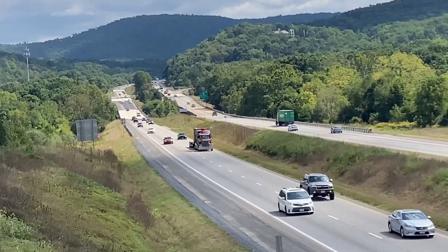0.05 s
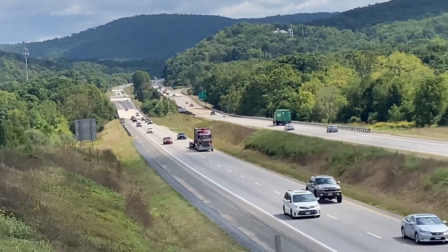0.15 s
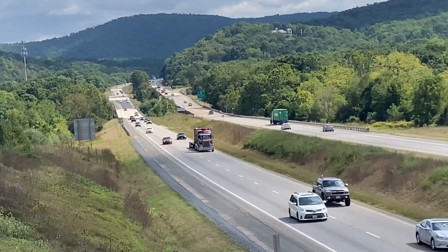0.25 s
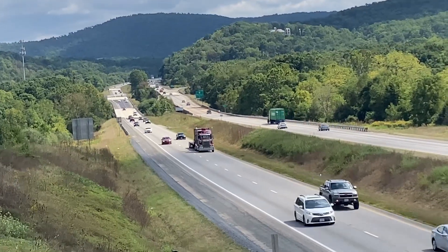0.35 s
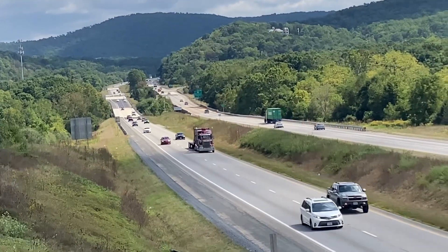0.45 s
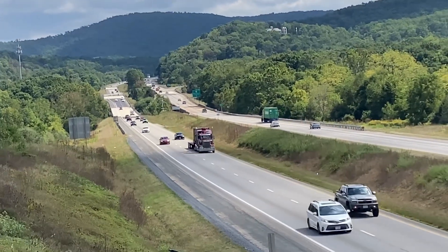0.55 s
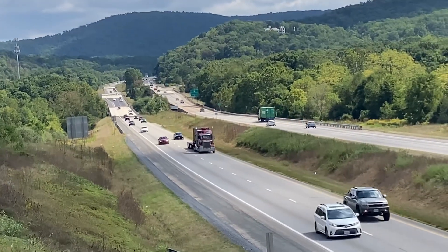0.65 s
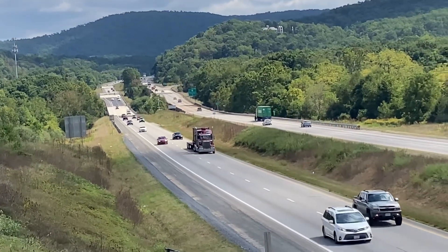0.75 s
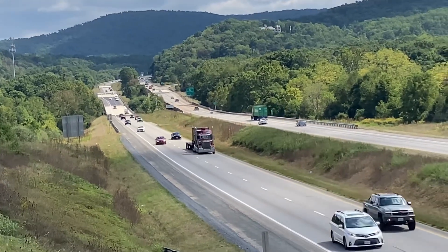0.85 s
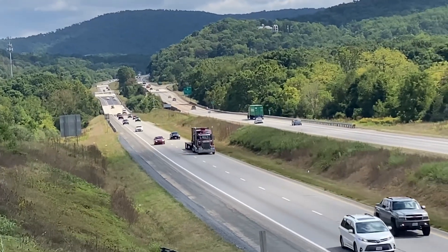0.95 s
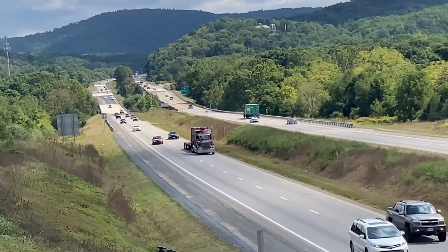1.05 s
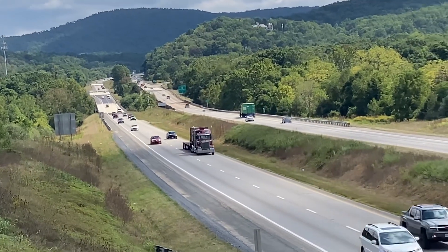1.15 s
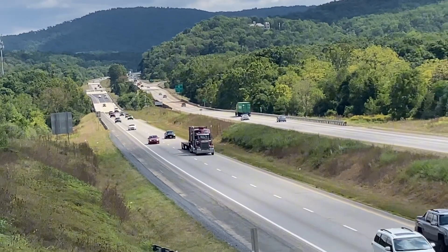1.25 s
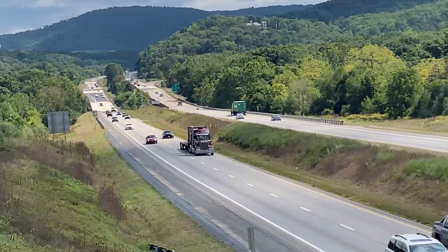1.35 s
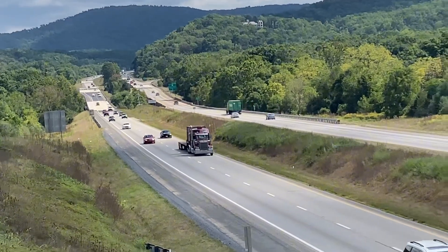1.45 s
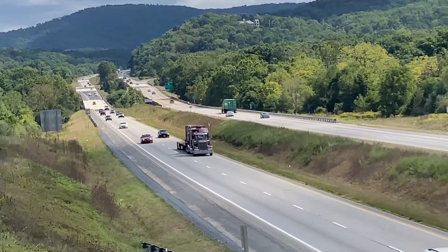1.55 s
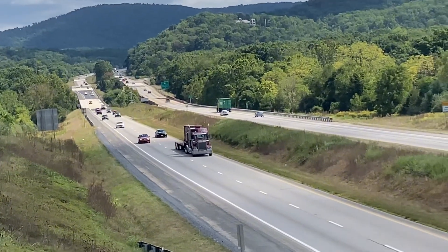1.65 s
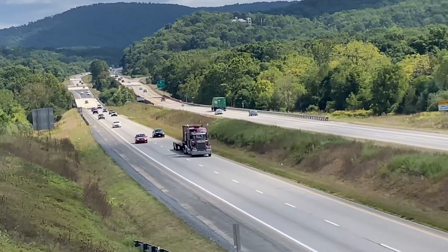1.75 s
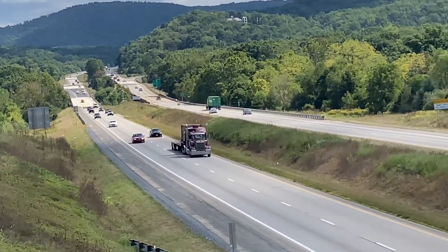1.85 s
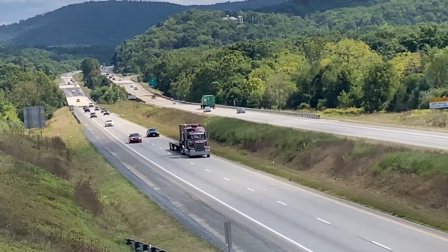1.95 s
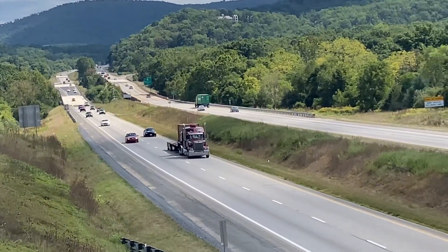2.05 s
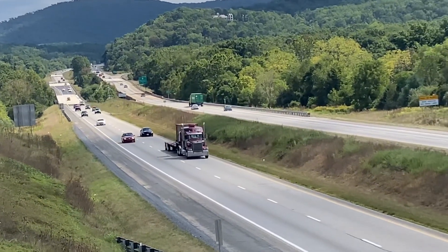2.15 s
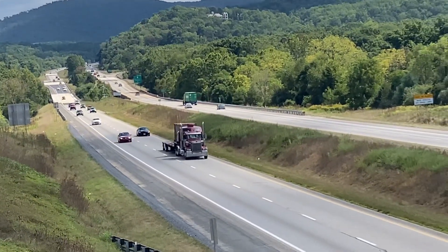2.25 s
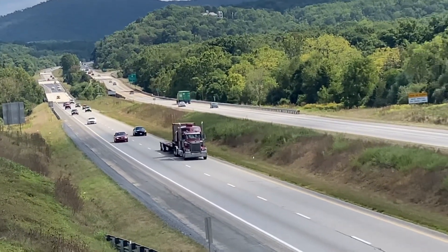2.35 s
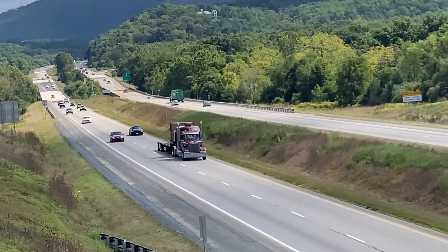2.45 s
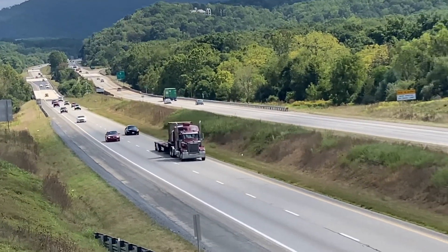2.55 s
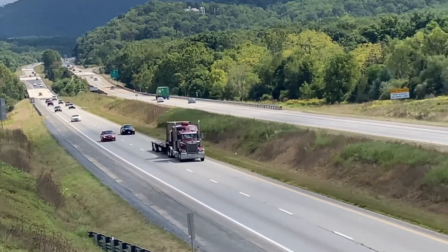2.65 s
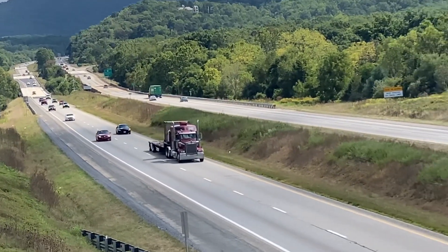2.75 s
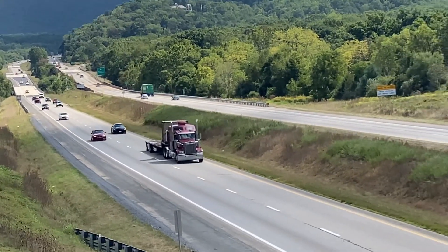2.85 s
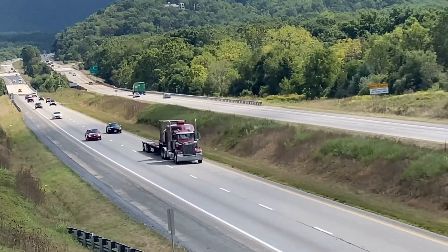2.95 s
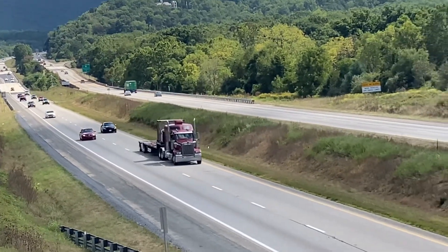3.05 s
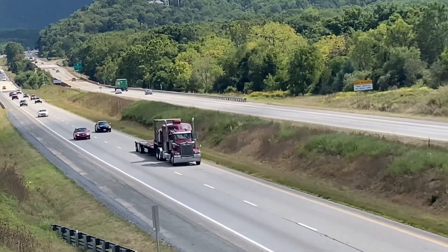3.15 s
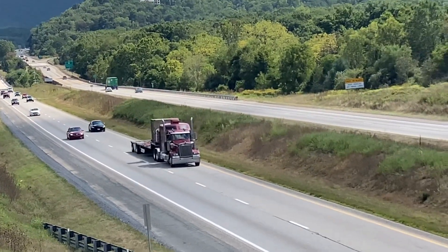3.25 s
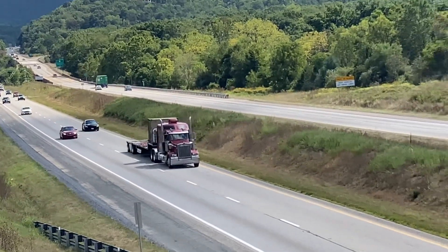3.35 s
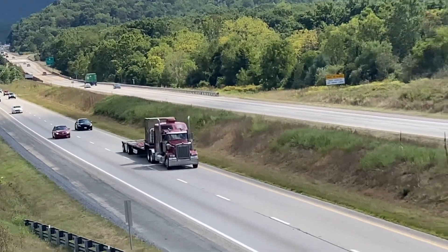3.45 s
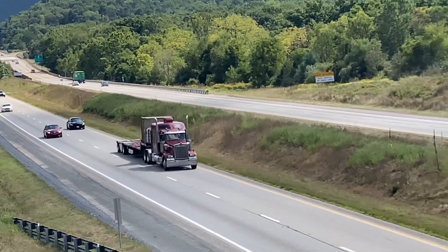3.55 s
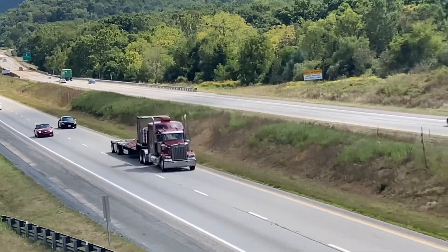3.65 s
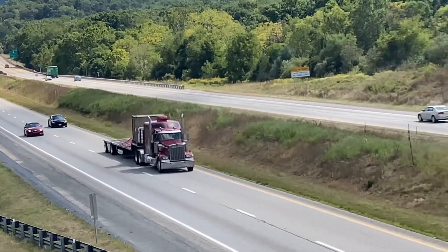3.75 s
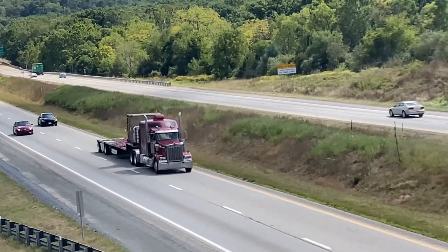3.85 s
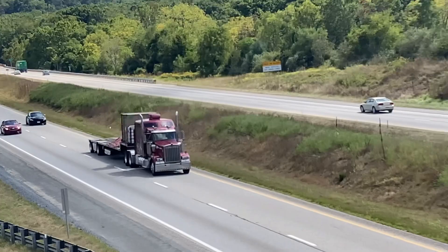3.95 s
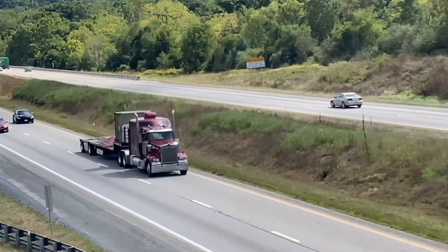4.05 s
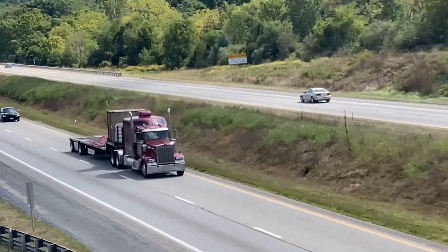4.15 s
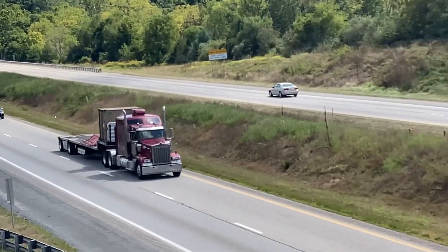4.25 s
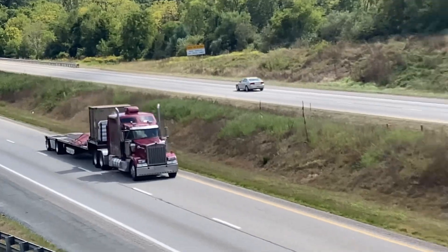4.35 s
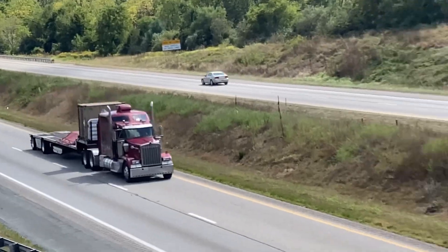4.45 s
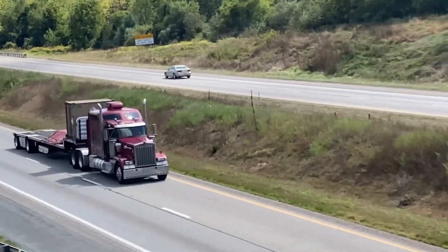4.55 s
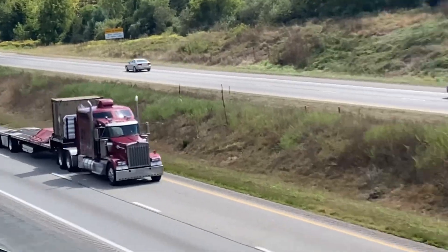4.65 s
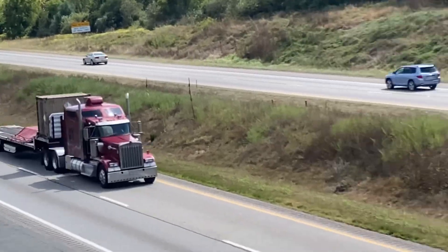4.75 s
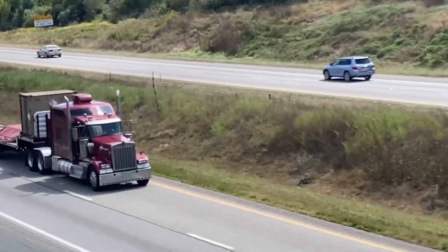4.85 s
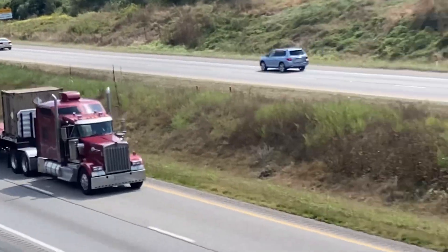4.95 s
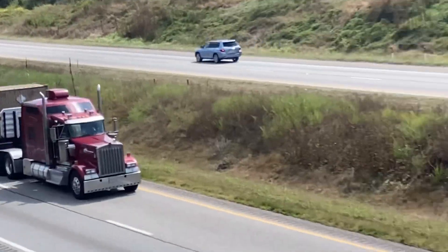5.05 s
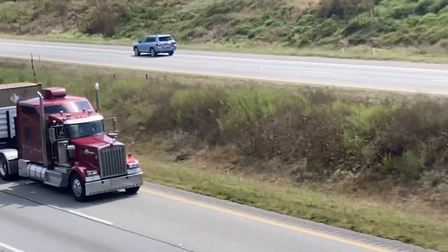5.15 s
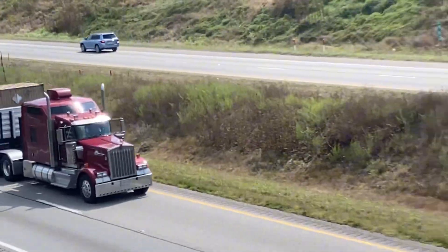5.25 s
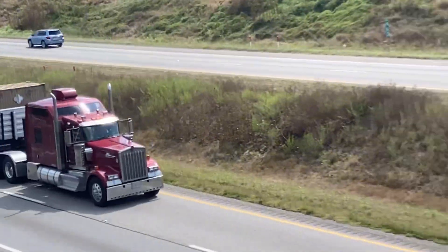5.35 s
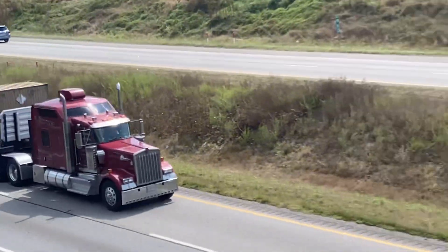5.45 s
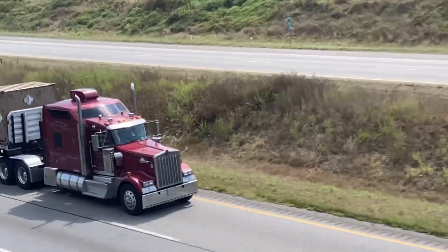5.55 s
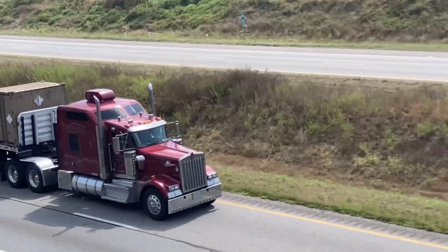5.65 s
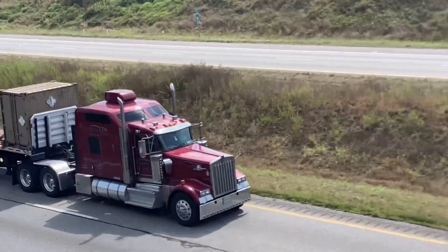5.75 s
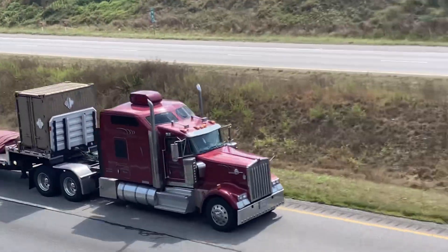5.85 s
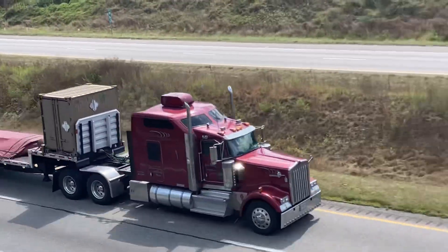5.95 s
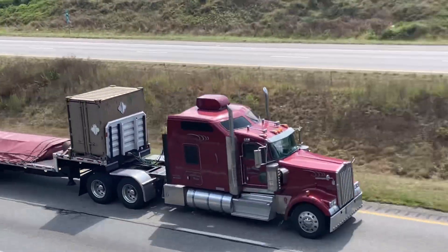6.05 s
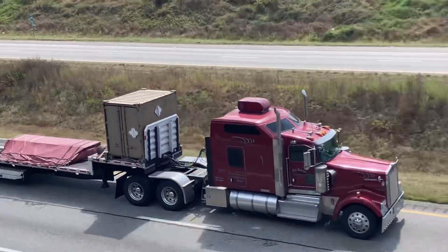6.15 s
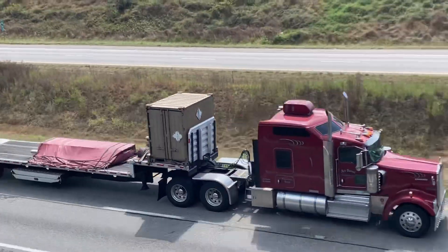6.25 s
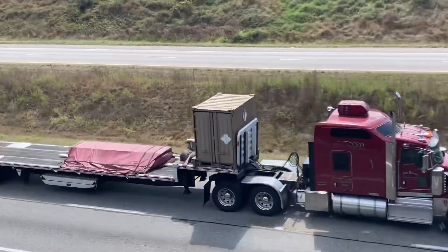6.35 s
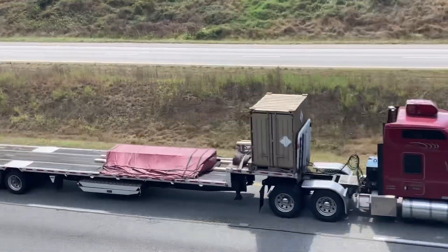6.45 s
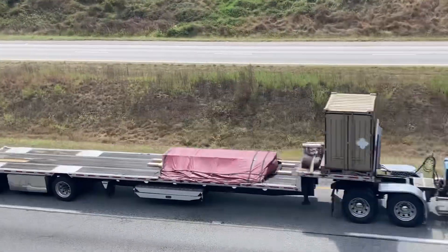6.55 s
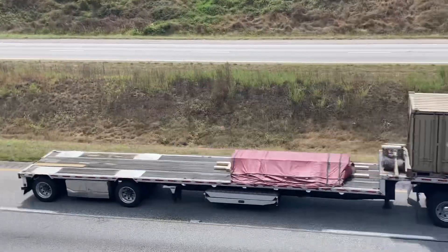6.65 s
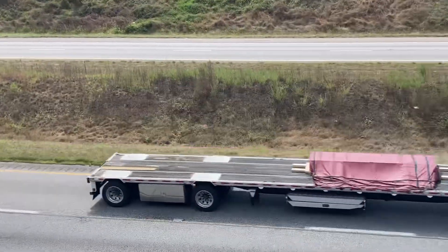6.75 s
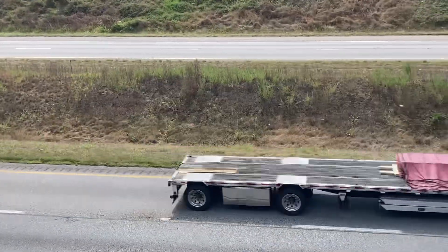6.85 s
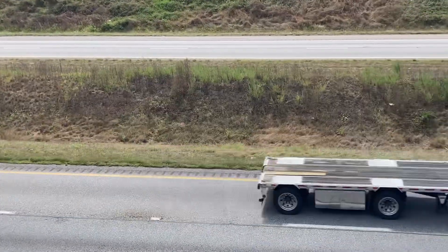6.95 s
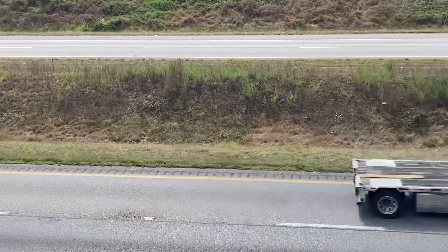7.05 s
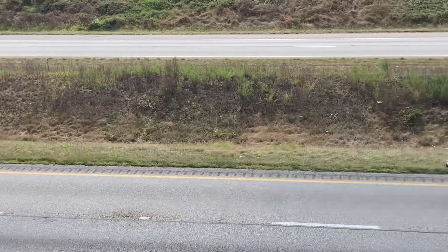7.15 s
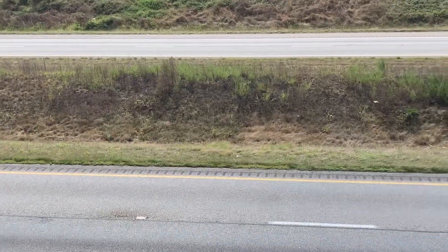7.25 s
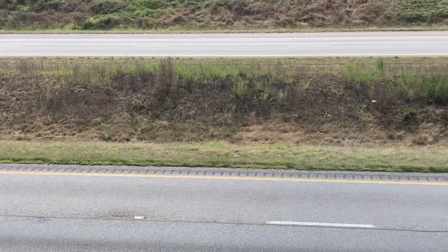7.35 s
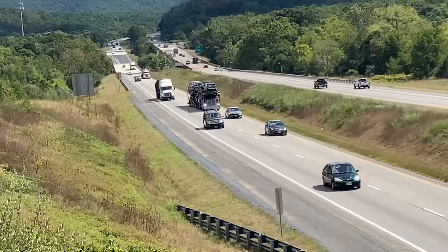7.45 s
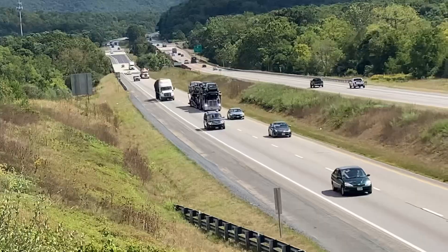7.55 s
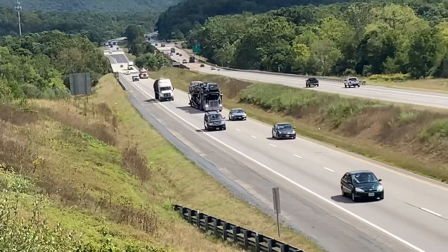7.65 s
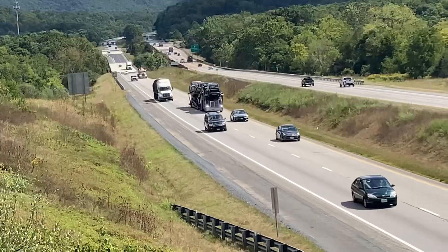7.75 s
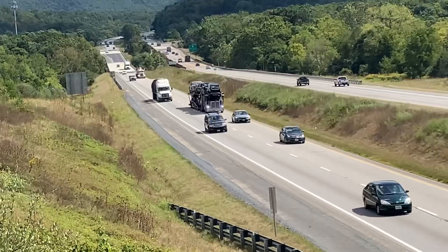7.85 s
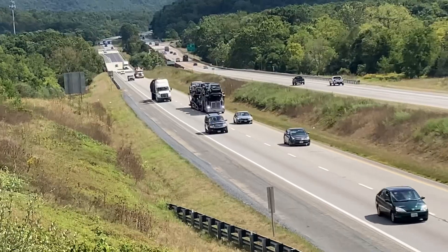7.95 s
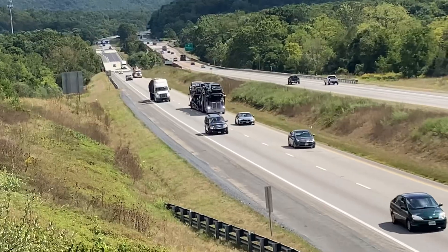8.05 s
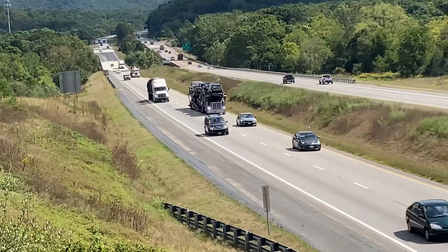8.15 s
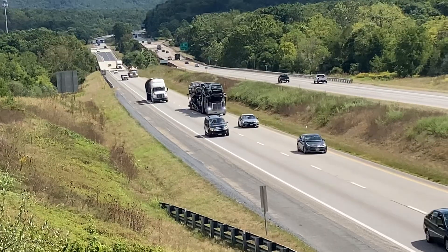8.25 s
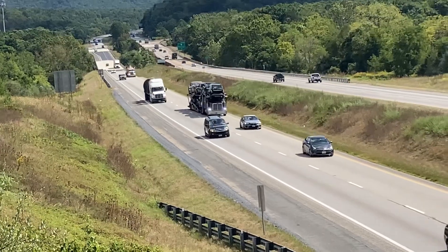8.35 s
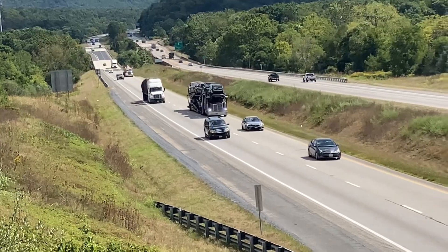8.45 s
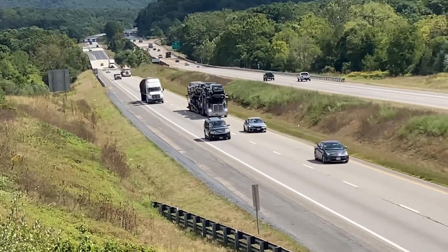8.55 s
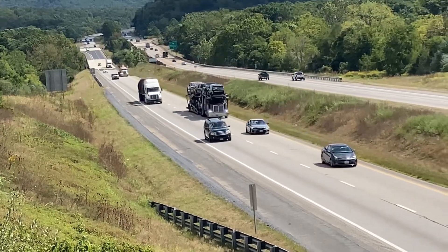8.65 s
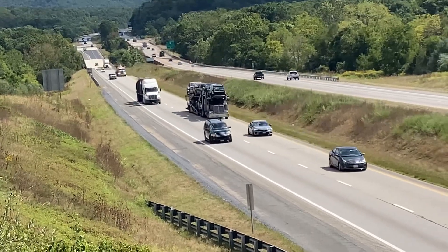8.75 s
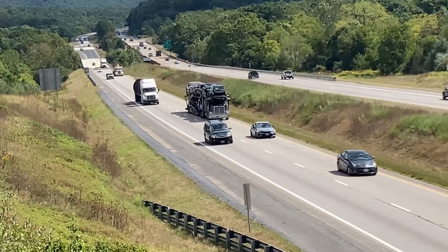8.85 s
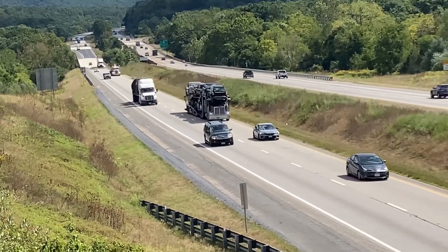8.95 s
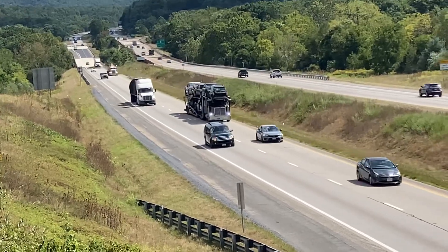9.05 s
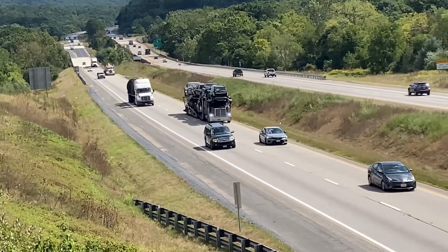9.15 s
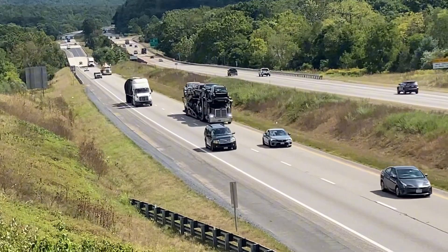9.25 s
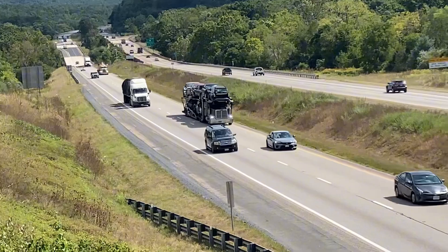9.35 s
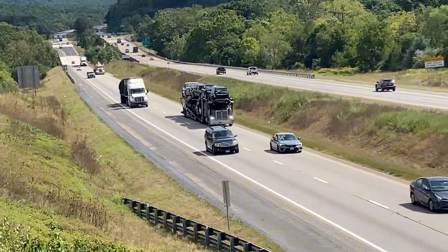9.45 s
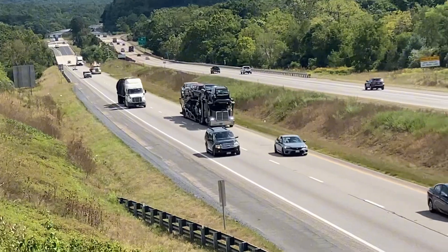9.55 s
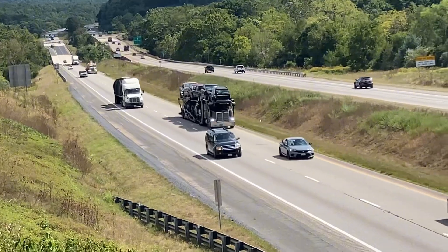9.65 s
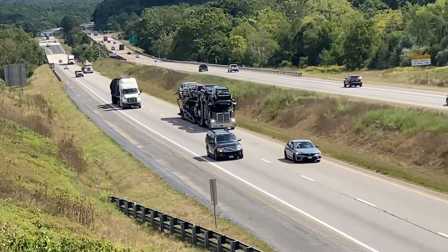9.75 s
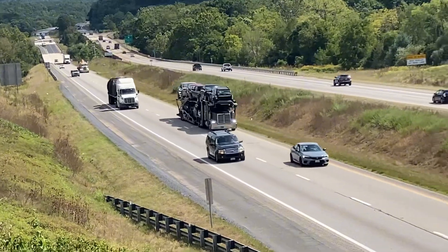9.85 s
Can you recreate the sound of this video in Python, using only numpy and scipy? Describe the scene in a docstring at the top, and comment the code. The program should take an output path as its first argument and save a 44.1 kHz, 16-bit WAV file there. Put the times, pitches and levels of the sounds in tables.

```python
"""Tyre roar and engine hum of a first car, then a droning pickup, on a busy highway below a grassy bank.
A heavy truck nears and passes with whining treads; then the scene jumps to a quieter moment with more cars.
Roar, rumble, wash and wind are random spectra; engine, exhaust, treads and tyre ring are wavering sines.
Two microphones a hand apart hear the sources with left-right lags."""
import sys
import numpy as np
from scipy import signal
from scipy.io import wavfile
from scipy.ndimage import uniform_filter1d

SR = 44100
rng = np.random.default_rng(int(sys.argv[2]) if len(sys.argv) > 2 else 0)


def persist_wave(psi):
    """Save psi, clipped to +-1, as 16-bit WAV."""
    counts = np.round(np.clip(psi, -1, 1) * 32767).astype(np.int16)
    wavfile.write(sys.argv[1], SR, np.atleast_2d(counts).T)


N = 436590

# One table per moment, traffic level: t/s, tyre roar/dB, body drone/dB,
# hiss near 3.7 kHz/dB re roar, air near 11 kHz/dB re roar
TRAFFIC = [
    [(0, -27.5, -29.5, -33, -42), (.5, -22.5, -32, -18.5, -38), (1.02, -24.5, -36.5, -21, -31.5),
     (1.4, -27.5, -37, -21.5, -33), (1.75, -27, -35.5, -17, -49), (2.1, -22.5, -35, -24, -38),
     (2.45, -22, -29.5, -17, -32.5), (3.0, -25, -33.5, -21, -25), (3.35, -29.5, -40, -13, -32.5),
     (3.8, -32.5, -42.5, -17.5, -49), (4.4, -32.5, -38.5, -16, -37), (4.9, -31, -35, -14, -27),
     (5.5, -27, -29, -15, -22.5), (5.95, -23.5, -25, -14, -21), (6.28, -21.5, -23.5, -16, -19),
     (6.65, -25, -23.5, -14, -22), (6.9, -25, -25.5, -20, -32.5), (7.45, -25.5, -36, -23.5, -40)],
    [(7.45, -36, -37.5, -18, -38), (7.73, -27, -39, -19.5, -47), (8.3, -24.5, -41, -23.5, -45),
     (8.8, -25, -33.5, -23.5, -43), (9.2, -22.5, -36, -22, -37), (9.55, -22, -33.5, -21.5, -35),
     (9.9, -27, -39, -26, -26)],
]
# One table per moment, bearing: t/s, left lag of nearest vehicle/samples, far-traffic share,
# wash from all around/dB re roar, L-R level/dB
BEARING = [
    [(0, 6.5, 0.44, 5.5, 0.5), (.5, 5.5, 0.039, -3.5, .5), (.9, 7, .03, -1, 0), (1.5, 7.5, 0.1, 2, 0),
     (2.05, 4, .05, -4, 0.5), (2.35, 7, 0.33, -3.5, 0.3), (2.7, 5, 0.026, -3.5, 0),
     (3.3, 14, 0.031, -0.5, -0.3), (4.1, 5, 0.17, -1, -0.2), (4.5, 9, .2, 1, 0), (4.65, -0.5, 0.3, -1, 0.5),
     (6, -5, 0.046, -3, 1), (6.5, -1, 0.1, -2.5, 1), (6.95, 5, 0.46, -2.5, 0.5), (7.45, 13, 0.7, -7, 0.5)],
    [(7.45, 1.6, 0.065, -8.5, 0.5), (9.2, 1.5, 0.018, -6, 0.5), (9.9, 6.8, 0.058, -0.5, 0.64)],
]
# Tyre roar, spectrum: f/Hz, relative density/dB
TYRE_SPECTRUM = [(300, -11.5), (600, -24), (800, -9.5), (1050, -7), (1400, -11), (1700, -14), (2100, -15.5),
                 (2300, -18), (3050, -16), (3400, -15.5), (4200, -14.5), (5800, -26), (7500, -24.5),
                 (11000, -38), (16000, -45.5)]
# Engine rumble, spectrum: f/Hz, relative density/dB
RUMBLE_SPECTRUM = [(40, -34), (70, 4.5), (100, -6.5), (150, -6.5), (220, -7.5), (350, -35)]
# Body drone, spectrum: f/Hz, relative density/dB
DRONE_SPECTRUM = [(120, -4), (220, -3), (350, -1.5), (480, -7), (700, -4), (1100, -9.5)]
# Deep rumble, spectrum: f/Hz, relative density/dB
DEEP_SPECTRUM = [(20, -18), (42, -4.5), (60, 9), (100, -4.5)]
# Wash from all around, spectrum: f/Hz, relative density/dB
WASH_SPECTRUM = [(150, -22), (300, -7), (550, 0), (850, 0), (1400, -5), (2200, -9), (3500, -19),
                 (6000, -30), (16000, -45)]
# Wind on each microphone, spectrum: f/Hz, relative density/dB
WIND_SPECTRUM = [(20, -12), (45, -4), (90, -22), (200, -2), (400, -42)]
# Bass: t/s, deep rumble level/dB, engine rumble level/dB
BASS_LEVEL = [(0, -29.5, -29.5), (1, -36, -28.5), (1.7, -38, -34), (2.5, -36, -26.5), (3.4, -35, -31),
              (4.7, -54, -31), (6.1, -50, -25.5), (6.7, -35.5, -37), (7.45, -41, -32.5), (7.46, -43, -36.5),
              (9.9, -43, -30.5)]
# Road echo: t/s, loudest roar f/Hz, strength 0-1
ROAD_ECHO = [(0, 1020, 0), (7.45, 970, 0.02), (7.46, 1090, 0.46), (8.8, 1070, 0.72), (9.55, 1230, 0.7),
             (9.9, 1010, 0)]
# Bands of the roar that stand out or sink: peak t/s, f/Hz, glide/(Hz/s), width/octaves,
# lift/dB, duration/s, L-R level/dB
ROAR_BANDS = [(1.13, 3370, 1, 0.15, 6, 0.42, 4), (2.96, 3300, 0, 0.27, 7, .5, 3),
              (6.2, 2320, -150, 0.07, 10.5, 0.74, 1), (5.74, 820, 0, 0.17, 5.5, 0.43, 1),
              (7.29, 926, -51, 0.22, 6, 0.32, 6), (7.27, 2260, 0, 0.35, 5, 0.42, -3),
              (8.3, 4500, 50, 0.13, 6.5, 0.89, -3), (9.05, 1000, 50, 0.27, 4, 1, -5),
              (8.3, 1680, 50, 0.096, 8, 1.0, 2), (9.38, 3850, 1900, 0.11, 6.5, 0.5, 2),
              (7.2, 2800, 0, .2, 6, .4, 0), (5.95, 600, -45, .11, 8, .85, 3),
              (5.1, 500, -30, .17, -6, .8, 0), (5.25, 880, 0, .5, 2, 0.29, 0),
              (5.06, 404, -20, .15, 4, .45, -2), (6.33, 354, -60, 0.18, 5, 0.59, -2),
              (8.4, 350, -60, 0.11, 6, .3, 0), (1.2, 1920, 0, 0.16, 4, 0.93, 4),
              (8.4, 2290, 0, 0.11, 5.5, 1, 4), (0.39, 590, 700, 0.38, 6.5, 0.27, -3),
              (0.5, 920, 350, .2, 4.5, 0.25, -4), (1.07, 1580, 1400, 0.27, 6, 0.16, 2),
              (2.4, 1010, 1200, 0.18, 4, 0.28, 3.5), (2.5, 2000, 500, 0.21, 1.5, 0.53, 2),
              (3.3, 700, 0, 0.44, 0, .25, -4), (9.5, 1600, 200, 0.11, 2.5, .25, 2),
              (9.36, 2250, 0, 0.21, 9.5, 0.33, 2), (8.57, 2950, 0, 0.084, 12, 0.55, 2),
              (4.2, 7300, 0, 0.18, 6.5, 0.64, 0), (8.4, 5400, 0, 0.11, 6, 0.72, 0),
              (5.6, 3730, -150, .07, 5, .8, 0), (5.2, 5500, 0, .15, -7, 0.82, -2)]
# Hiss of each car in turn sweeping across: t/s, left lag/samples
HISS_LAG = [(0, 2), (.3, 4), (.75, 10), (1.45, 15), (1.55, 8), (2.05, 12), (2.15, 3), (2.7, 10), (3.2, 15),
            (3.5, 15.5), (3.58, 10), (4.35, 6), (4.45, -3), (5.9, -3.5), (6.4, 0), (7.44, 8), (7.46, 1),
            (8.5, 2), (9, 5), (9.4, 10.5), (9.9, 14)]
# Stereo spread: f/Hz, diffuse share of a near vehicle, left-right likeness of diffuse sound
STEREO_SPREAD = [(60, .1, .9), (300, .05, .6), (620, .03, -.45), (1200, .03, 0), (2500, .12, 0),
                 (5000, .3, 0), (7000, .1, 0)]
# Weight of the L-R level against frequency: f/Hz, factor
SHADE_WEIGHT = [(100, .1), (700, 2.9), (1500, 5), (2800, 3.3), (5000, .1), (9000, .05)]
# Truck tread whines: peak t/s, f at rest/Hz, axle behind middle/m, blur/cycles, level/dB, swell/s, fade/s
TRUCK_TREADS = [(6.6, 312, 6, 0.07, -25, .13, 0.1), (6.63, 342, 7, 0.1, -23, 0.15, 0.1),
                (6.88, 332, 4, .05, -27, .12, .12), (5.55, 319, 6, .07, -35, .3, .3),
                (5.97, 372, 5, .04, -25.5, .22, .25), (6.33, 372, 5, 0.07, -19.5, .11, 0.17),
                (6.68, 370, 5, .05, -22.5, .25, .13), (6.0, 546, 5, 0.09, -25, .5, 0.3),
                (6.33, 546, 4, .09, -24, .2, .15), (6.53, 548, 5, 0.1, -23.5, .12, 0.15),
                (6.88, 546, 4, .09, -33, .15, .15), (7.13, 538, 3, .07, -32, .17, .07),
                (4.8, 586, 5, .08, -37, .2, .25), (5.15, 556, 5, .08, -35, .2, .2),
                (5.58, 588, 5, .08, -30.5, .2, .2), (5.8, 566, 5, .12, -29, .4, .15),
                (6.1, 585, 5, .09, -30, .25, .2), (6.62, 582, 5, .09, -28, .2, .1),
                (6.25, 1020, 0, .1, -35, .5, .3), (6.76, 1020, 0, .07, -28, .17, .08),
                (6.25, 815, 0, .1, -31, .1, .1), (5.35, 350, 6.5, 0.1, -34, .4, 0.3)]
# Air ring in the truck tyres: t/s, level/dB
CAVITY_LEVEL = [(4.1, -39), (4.3, -35.5), (4.7, -31.5), (5.1, -34.5), (5.45, -26), (5.85, -26.5),
                (6.02, -29), (6.2, -26.5), (6.55, -22.5), (6.8, -30.5), (7.0, -43)]
# Pickup exhaust drone: t/s, level/dB
EXHAUST_LEVEL = [(.8, -41), (1.4, -34), (1.5, -26), (2.2, -22), (3.03, -20.5), (3.3, -26.5), (3.42, -34),
                 (3.6, -24.5), (3.74, -25.5), (3.96, -35), (4.06, -26.5), (4.35, -34.5), (4.65, -42),
                 (4.85, -33.5), (5.15, -32), (5.4, -49)]
# Pickup tread whine: peak t/s, f at rest/Hz, axle behind front/m, blur/cycles, level/dB, swell/s, fade/s
PICKUP_TREAD = (2.9, 306.5, -1, 0.08, -36, 1.5, 0.5)
# First car's engine: peak t/s, firing order, level/dB, swell/s, fade/s
ENGINE_ORDERS = [(0.15, 1, -29.5, 0.28, 0.44), (1.03, 1, -29, .25, 0.2), (.72, 2, -28, .25, 0.33),
                 (.5, 3, -30.5, .15, 0.2), (0.479, 4, -32.5, 0.298, 0.2)]
# Faint hum off to one side: peak t/s, f/Hz, level/dB, swell/s, fade/s
FAR_HUM = (10.5, 492.5, -44, 1.5, 1)
# Passing truck: abreast t/s, speed/(m/s), distance to lane/m
TRUCK_PASS = (6.6, 31, 19)
# Passing pickup: abreast t/s, speed/(m/s), distance to lane/m
PICKUP_PASS = (3.18, 30, 17)

# left lag/samples: far traffic; one constant lag for all treble above about 6 kHz
FAR_LAG_SAMPLES, TREBLE_LAG_SAMPLES = -16.5, 8
WASH_COMB_EXPONENT = 0.33  # the wash keeps this share, in dB, of the road echo's notch
WIND_DB = -45
WHEEL_HZ, TREAD_THROB = 9.7, 0.3  # tyres are not quite round: whines pulse once a turn
CAVITY_HZ, CAVITY_CYCLES_PER_TURN, CAVITY_AXLE_M = 203.6, 21.2, -1.5  # at rest; axle behind truck middle
EXHAUST_HZ = 138.9  # at rest
FIRING_HZ, SAG_HZ_PER_S = 84, 1.4  # at t = 0
EDGE_HZ = 15800


def gain_of(db):
    """Decibels to amplitude."""
    return 10 ** (np.asarray(db) / 20)


def evened(x):
    """Scales to rms 1."""
    return x / np.sqrt(np.mean(x ** 2) + 1e-20)


def columns(rows, x):
    """Interpolates every column after the first at x."""
    knots, *values = np.transpose(rows)
    return [np.interp(x, knots, v) for v in values]


def wander(t, top_hz):
    """Slow random curve of rms 1: 16 sines up to top_hz, weaker with frequency."""
    rates_hz = np.geomspace(top_hz / 8, top_hz, 16)
    return evened(sum(np.sin(2 * np.pi * (f * t + rng.random())) / np.sqrt(f) for f in rates_hz))


def shape(points, hz, lo_hz, hi_hz):
    """Power spectrum as a column, summing to 1 between lo_hz and hi_hz."""
    f, db = np.transpose(points)
    power = gain_of(2 * np.interp(np.log(hz + 1), np.log(f), db, left=-60, right=-60))
    return (power / power[(hz > lo_hz) & (hz < hi_hz)].sum())[:, None]


def swell(peak_s, db, rise_s, fade_s):
    """Times and level of a sound 10 dB down rise_s before and fade_s after its peak."""
    t = np.arange(max(peak_s - 1.6 * rise_s, 0), peak_s + 1.47 * fade_s, 1 / SR)
    return t, db - 10 * ((t - peak_s) / np.where(t < peak_s, rise_s, fade_s)) ** 2


def doppler(t, abreast_s, speed, lane_m, axle_m=0):
    """Pitch factor of a point on a passing vehicle, from its closing speed."""
    to_go_m = speed * (abreast_s - t) + axle_m
    away_m = np.hypot(to_go_m, lane_m)
    return 1 / (1 - speed / 343 * to_go_m / away_m)


def tone(t, hz, db, lag, waver_db, fuzz, throb=0):
    """Start time and stereo sine, wavering in level and phase; left ear lags by lag samples."""
    phase = 2 * np.pi * (np.cumsum(hz) / SR + fuzz * wander(t, 30))
    level = np.sqrt(2) * gain_of(db + waver_db * wander(t, 24))
    level = level * (1 + throb) * signal.windows.tukey(len(t), .1)
    return t[0], level * np.sin([phase - 2 * np.pi * hz * lag / SR, phase])


def add(mix, s, sound):
    """Mixes a stereo sound in at s seconds."""
    part = mix[:, round(s * SR):][:, :sound.shape[1]]
    part += sound[:, :part.shape[1]]


def tyre_power(t, hz, roar_db, hiss_db, air_db):
    """Tyre roar: fixed tread spectrum plus moving hiss and air, with flickering treble."""
    f = hz[:, None]
    tread_power = shape(TYRE_SPECTRUM, hz, 750, 1700)
    # lifts relative to what the tread spectrum already holds in each band
    hiss_db = hiss_db - 10 * np.log10(tread_power[(hz > 3000) & (hz < 4500)].sum())
    air_db = air_db - 10 * np.log10(tread_power[(hz > 9800) & (hz < 12500)].sum())
    knots = np.log([1500, 3700, 11000])
    hissy = np.interp(np.log(f + 1), knots, [0, 1, 0])
    airy = np.interp(np.log(f + 1), knots, [0, 0, 1])
    # flicker grows with each octave
    treble_octaves = np.log2(np.maximum(f, 1500) / 1500)
    top_octaves = np.log2(np.maximum(f, 6000) / 6000)
    colour_db = hissy * hiss_db + airy * air_db
    colour_db += top_octaves * wander(t, 40) + 0.53 * treble_octaves * wander(t, 50)
    colour_db += 0.7 * np.exp(-np.log2((f + 1) / 1900) ** 2) * wander(t, 70)  # grit of the asphalt
    return tread_power * gain_of(2 * (roar_db + colour_db))


def roar_bands(t, f):
    """Gliding bands that stand out or sink: lift and L-R level, both in dB."""
    bands_db, lean_db = 0, 0
    for peak_s, band_hz, glide, octaves, lift_db, lasts_s, side_db in ROAR_BANDS:
        centre_hz = np.maximum(band_hz + glide * (t - peak_s), 200)
        off_octaves = np.log2((f + 1) / centre_hz)
        band = np.exp(-(off_octaves / octaves) ** 2 - ((t - peak_s) / lasts_s) ** 2)
        bands_db = bands_db + lift_db * band
        lean_db = lean_db + side_db * band
    return bands_db, lean_db


def road_comb(t, f):
    """Road echo cancels the band below the loudest roar; rough asphalt scatters its high end."""
    peak_hz, echo = columns(ROAD_ECHO, t)
    echo = np.clip(echo, 0, .95) * np.exp(-f / 4000)
    return (1 + echo ** 2 + 2 * echo * np.cos(np.pi * f / (0.56 * peak_hz))) / (1 + echo) ** 2


def bass_power(t, hz):
    """Engine rumble and deep rumble."""
    deep_db, rumble_db = columns(BASS_LEVEL, t)
    rumble = shape(RUMBLE_SPECTRUM, hz, 70, 135) * gain_of(2 * rumble_db)
    return rumble + shape(DEEP_SPECTRUM, hz, 30, 62) * gain_of(2 * deep_db)


def lag_by_band(t, f, lag):
    """Left lag/samples: nearest vehicle low down, sweeping hiss above 2 kHz, constant above about 6 kHz."""
    lag = lag + (columns(HISS_LAG, t)[0] - lag) * np.clip((f - 1600) / 800, 0, 1)
    return lag + (TREBLE_LAG_SAMPLES - lag) * np.clip((f - 5200) / 1200, 0, 1)


def noise(t, hz):
    """Complex Gaussian spectrogram."""
    size = (len(hz), len(t))
    return rng.standard_normal(size) + 1j * rng.standard_normal(size)


def roar(rows, bearing):
    """One moment's roar, rumble, drone, wash and wind: random spectra placed left to right."""
    size, hop = 1024, 256
    count = round((rows[-1][0] - rows[0][0]) * SR)
    t = rows[0][0] + np.arange(count // hop + 5) * hop / SR
    hz = np.fft.rfftfreq(size, 1 / SR)
    f = hz[:, None]
    roar_db, drone_db, hiss_db, air_db = columns(rows, t)
    lag, far, wash_db, pan_db = columns(bearing, t)
    diffuse, alike = (c[:, None] for c in columns(STEREO_SPREAD, hz))
    shade = columns(SHADE_WEIGHT, hz)[0][:, None]

    tyres = tyre_power(t, hz, roar_db, hiss_db, air_db)
    drone = shape(DRONE_SPECTRUM, hz, 250, 540) * gain_of(2 * drone_db)
    bands_db, lean_db = roar_bands(t, f)
    comb = road_comb(t, f)
    power = (tyres + drone) * comb * gain_of(2 * bands_db) + bass_power(t, hz)
    wash = shape(WASH_SPECTRUM, hz, 400, 1500) * gain_of(2 * (roar_db + wash_db)) * comb ** WASH_COMB_EXPONENT
    aimed = np.sqrt(power * (1 - diffuse))
    around = np.sqrt(power * diffuse + wash)

    far = np.clip(far, 0, 1)
    near = noise(t, hz) * np.sqrt(1 - far)
    distant = noise(t, hz) * np.sqrt(far)
    around_right, unlike = noise(t, hz), noise(t, hz)
    around_left = alike * around_right + np.sqrt(1 - alike ** 2) * unlike
    delay = -2j * np.pi * f / SR
    aimed_left = near * np.exp(delay * lag_by_band(t, f, lag)) + distant * np.exp(delay * FAR_LAG_SAMPLES)
    left = aimed * aimed_left + around * around_left
    right = aimed * (near + distant) + around * around_right

    shadow = gain_of((pan_db * shade + lean_db) / 2)
    # random patches, level shared by both ears
    patches = uniform_filter1d(rng.standard_normal((len(hz), len(t))), 14, axis=1)
    patches = evened(uniform_filter1d(patches, 6, axis=0))
    z = np.array([left * shadow, right / shadow]) * gain_of(1.3 * patches)
    z += wind(t, hz)
    sound = signal.istft(z, nperseg=size, noverlap=size - hop)[1][:, :count]
    return sound * signal.windows.tukey(count, 60 / count)


def tread(row, vehicle, **kind):
    """One set of tyres whines, falling in pitch as its axle goes by."""
    peak_s, hz, axle_m, blur, *level = row
    t, db = swell(peak_s, *level)
    throb = TREAD_THROB * np.cos(2 * np.pi * (WHEEL_HZ * t + rng.random()))
    return tone(t, hz * doppler(t, *vehicle, axle_m), db, fuzz=blur, throb=throb, **kind)


def cavity():
    """Air rings inside the truck tyres, swelling once per wheel turn."""
    t = np.arange(CAVITY_LEVEL[0][0], CAVITY_LEVEL[-1][0], 1 / SR)
    hz = CAVITY_HZ * doppler(t, *TRUCK_PASS, CAVITY_AXLE_M)
    turns = np.cumsum(hz) / SR / CAVITY_CYCLES_PER_TURN
    throb = 0.85 * np.cos(2 * np.pi * turns - 3.3)
    return tone(t, hz, columns(CAVITY_LEVEL, t)[0], lag=1.0, waver_db=2.0, fuzz=0.11, throb=throb)


def exhaust():
    """The pickup's drone drops in pitch as it goes by."""
    t = np.arange(EXHAUST_LEVEL[0][0], EXHAUST_LEVEL[-1][0], 1 / SR)
    hz = EXHAUST_HZ * doppler(t, *PICKUP_PASS)
    return tone(t, hz, columns(EXHAUST_LEVEL, t)[0], lag=17.0, waver_db=1.0, fuzz=0.022)


def engine(peak_s, order, *level):
    """One multiple of the first car's sagging firing rate."""
    t, db = swell(peak_s, *level)
    return tone(t, round(order) * (FIRING_HZ - SAG_HZ_PER_S * t), db, lag=41, waver_db=1.0, fuzz=0.085)


def far_hum(peak_s, hz, *level):
    """Faint hum at a set pitch, wavering in level."""
    t, db = swell(peak_s, *level)
    return tone(t, hz + 0 * t, db, lag=-11, waver_db=5.5, fuzz=0.058)


def wind(t, hz):
    """Wind on each microphone: independent noise, level wandering in common."""
    gusts = np.array([noise(t, hz), noise(t, hz)])
    return gusts * np.sqrt(shape(WIND_SPECTRUM, hz, 20, 200)) * gain_of(WIND_DB + 0.97 * wander(t, 3))


def scene():
    """All traffic, both moments."""
    mix = np.zeros((2, N))
    for rows, bearing in zip(TRAFFIC, BEARING):
        add(mix, rows[0][0], roar(rows, bearing))
    for row in TRUCK_TREADS:
        add(mix, *tread(row, TRUCK_PASS, lag=-1.8, waver_db=1.1))
    add(mix, *cavity())
    add(mix, *exhaust())
    add(mix, *tread(PICKUP_TREAD, PICKUP_PASS, lag=27, waver_db=4.0))
    for row in ENGINE_ORDERS:
        add(mix, *engine(*row))
    add(mix, *far_hum(*FAR_HUM))
    return mix


def record(dry):
    """The microphones drop the deepest bass; then the band limit."""
    thin = signal.sosfilt(signal.butter(5, 39, "highpass", fs=SR, output="sos"), dry)
    band_limit = signal.firwin(511, EDGE_HZ, window=("kaiser", 9), fs=SR)
    return signal.oaconvolve(thin, band_limit[None], "same")


dry = scene()
out = record(dry)
persist_wave(out)
```